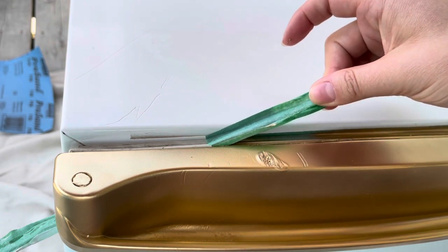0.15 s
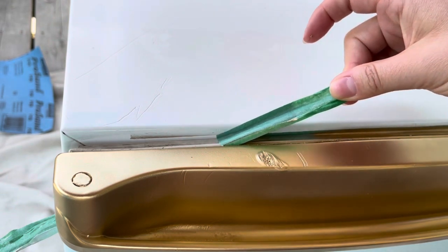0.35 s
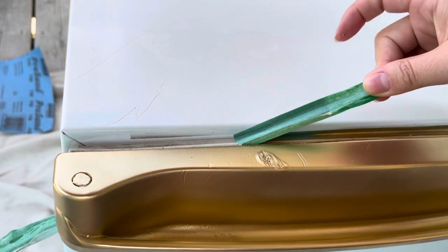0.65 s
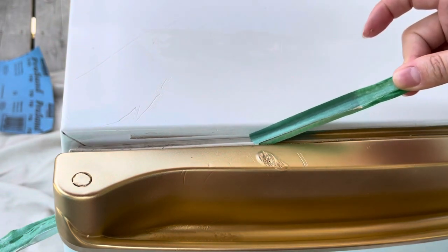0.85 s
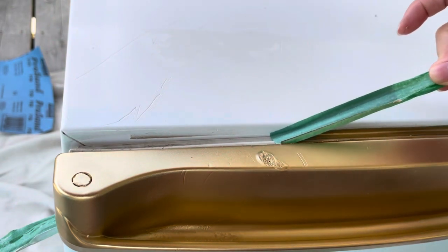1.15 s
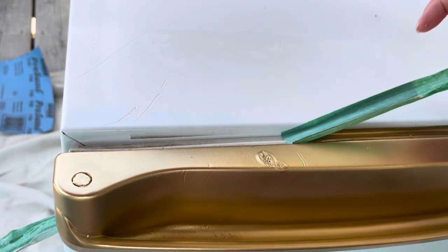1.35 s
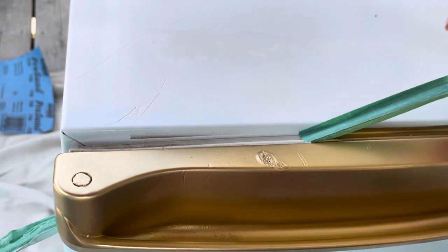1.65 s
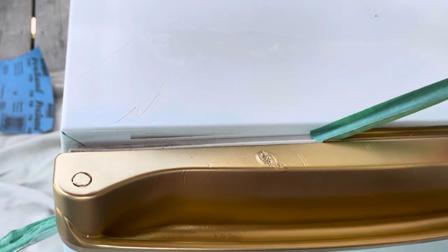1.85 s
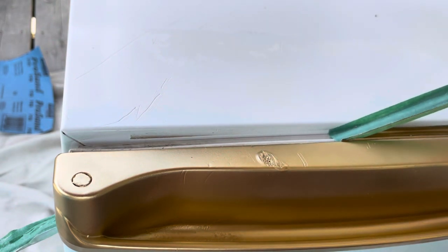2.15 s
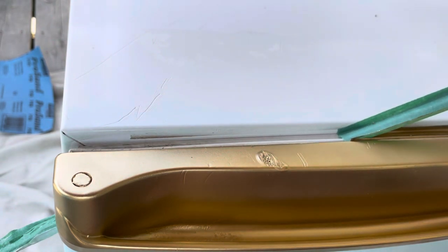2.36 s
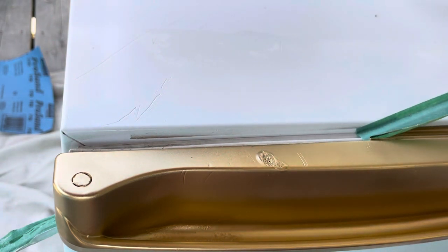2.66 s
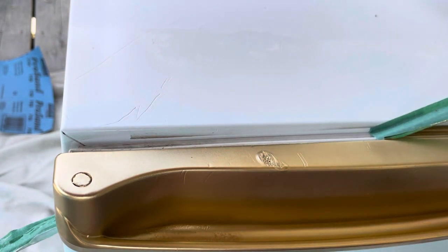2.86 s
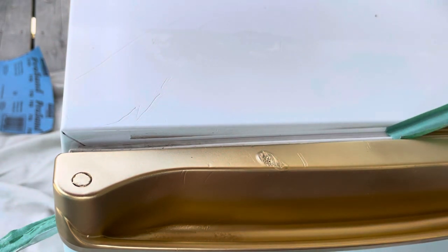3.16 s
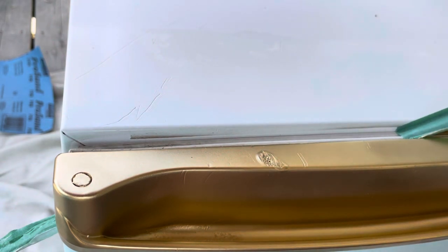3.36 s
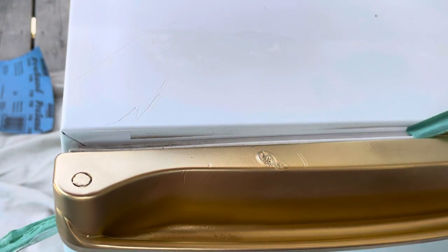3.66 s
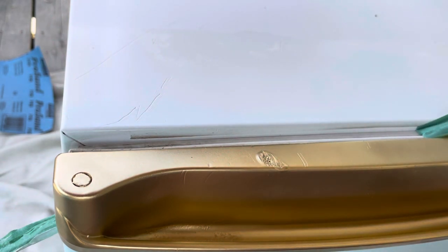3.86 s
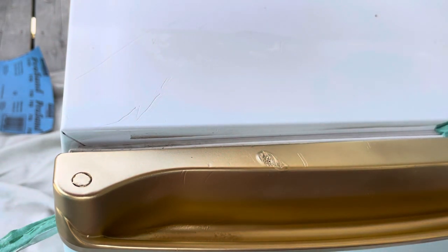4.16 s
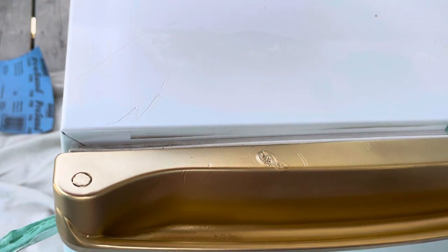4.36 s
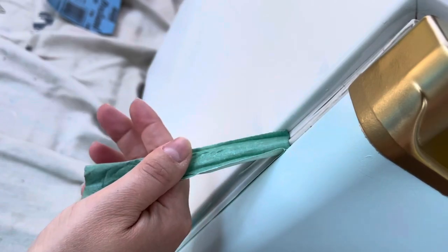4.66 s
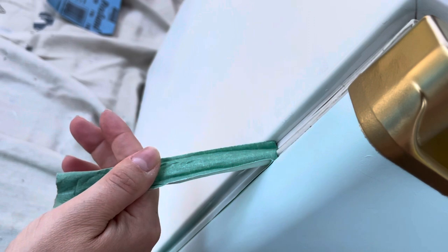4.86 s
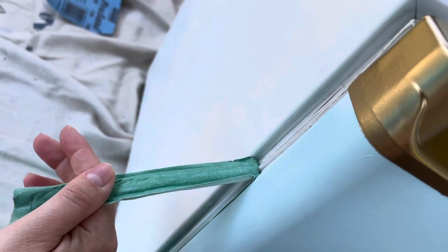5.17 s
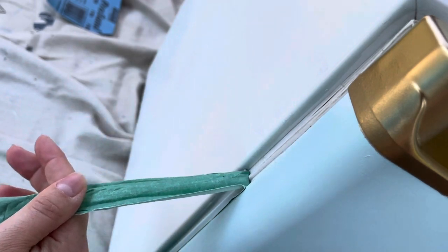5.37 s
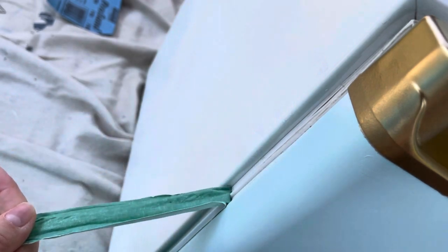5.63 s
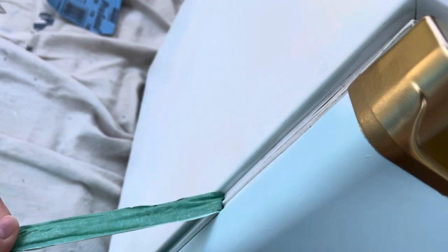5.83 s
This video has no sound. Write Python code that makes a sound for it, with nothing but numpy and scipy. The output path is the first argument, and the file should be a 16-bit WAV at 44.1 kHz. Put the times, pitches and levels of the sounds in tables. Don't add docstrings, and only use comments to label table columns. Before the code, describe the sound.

Masking tape peels slowly off a painted lid, a close continuous papery crackle with sharp ticks, over faint distant traffic and a few sparrow chirps.

```python
import sys
import numpy as np
from scipy import signal
from scipy.fft import rfft, irfft, next_fast_len
from scipy.io import wavfile
from scipy.ndimage import uniform_filter1d, minimum_filter1d

SR = 44100
rng = np.random.default_rng(int(sys.argv[2]) if len(sys.argv) > 2 else 0)


def waveform_to_disk(signal):
    frames = np.transpose(np.atleast_2d(signal))
    scaled = np.clip(frames, -1, 1) * 32767
    samples = np.round(scaled).astype(np.int16)
    wavfile.write(sys.argv[1], SR, samples)


def invert_db(x):
    u = np.asarray(x, float) / 20
    return 10 ** u


N = 264600


def evened(x):
    return x / np.sqrt(np.mean(x ** 2) + 1e-20)


def slow(size):
    smooth = uniform_filter1d(rng.standard_normal(N), size=size)
    return evened(uniform_filter1d(smooth, size=size))


def read(points, hz):
    f, value = np.transpose(points)
    return np.interp(np.log(hz + 1), np.log(f + 1), value)


def curves(rows, t):
    s, *columns = np.transpose(rows)
    return [np.interp(t, s, c) for c in columns]


def add(mix, s, sound):
    part = mix[round(s * SR):][:len(sound)]
    part += sound[:len(part)]


def coloured(x, gain):
    size = next_fast_len(x.shape[-1])
    spectrum = rfft(x, size) * gain(np.fft.rfftfreq(size, 1 / SR))
    return irfft(spectrum, size)[..., :x.shape[-1]]


def ring(modes):
    return lambda hz: sum(invert_db(db) * 1j * hz * w / (f ** 2 - hz ** 2 + 1j * hz * w) for f, w, db in modes)


def tone(x, rows, width_hz):
    hz, db = curves(rows, np.arange(N) / SR)
    turn = np.exp(2j * np.pi * np.cumsum(hz) / SR)
    r = np.exp(-np.pi * width_hz / SR)
    smooth = signal.lfilter([1], np.convolve([1, -r], [1, -r]), x / turn)
    return invert_db(db) * evened((turn * smooth).real)


# f/Hz, left lead/rad
PORT_PHASE = [(300, 1), (2000, 1), (5000, 1), (5700, -1.4), (7000, -1.76), (8500, -3), (10000, -3.5),
              (12000, -5.5), (13500, -6.5), (17000, -5)]
# f/Hz, left over right/dB
PORT_TILT = [(300, 16), (2500, 3.5), (5000, 3.5), (8000, 1), (16000, -0.5)]


def ports(x):
    half = lambda hz: np.exp(.5j * read(PORT_PHASE, hz)) * invert_db(read(PORT_TILT, hz) / 2)
    return np.array([coloured(x, half), coloured(x, lambda hz: 1 / half(hz))])


def echoes(x, t60, start, top_hz):
    t = np.arange(SR // 4) / SR
    taps = rng.choice([-1., 1.], (2, len(t))) * (rng.random((2, len(t))) < .06) * (t > start)
    taps *= invert_db(-60 * t / t60)
    taps = coloured(taps / np.linalg.norm(taps[0]), lambda hz: 1 / (1 + (hz / top_hz) ** 6))
    return signal.fftconvolve(x[None], taps, axes=1)[:, :N]


# t/s, pull as glue fizz/dB, tension ringing the strip/dB, twist favouring its upper ring/dB
PULL = [(0.0, -52.5, -7.5, 5), (0.25, -46, -7.5, 2), (0.7, -45, -6.5, 1), (1.0, -46, -2.5, -11),
        (1.45, -46, -5, -4), (1.9, -46, -3.5, -2), (2.25, -47, -2, -1), (2.65, -47.5, -0.5, 0.5),
        (3.05, -48, 0.8, -10), (3.5, -49.5, -3, 1.5), (3.85, -47.5, -3, -19), (4.15, -44.5, -5.5, -5),
        (4.5, -45.5, -3, -4), (4.87, -43.5, -5, -4), (5.2, -45, -15, 8.5), (5.5, -40.5, -8.5, 6.5),
        (5.75, -48, -7.5, 3), (6.0, -41.5, -7.5, -4)]
# t/s, level/dB, half length/s
JERKS = [(0.2, 2, .06), (1.005, 3, 0.065), (1.458, 2.5, .07), (1.61, 0, 0.045), (1.7, 1, 0.047),
         (2.29, -3, 0.065), (2.424, 5, .07), (2.692, 5.5, 0.056), (3.237, 2.5, .09), (3.693, 3, 0.028),
         (3.99, 2.5, 0.062), (4.123, -6, .02), (4.167, 4, .03), (4.3, -7.5, .07), (4.623, 4, 0.037),
         (4.94, 7, 0.038), (4.99, 3, .04), (5.065, -4.5, 0.049), (5.27, -2.5, 0.041), (5.416, -5, 0.017),
         (5.453, 3, .03)]
# f/Hz, level/dB
FIZZ = [(4000, -32), (6500, -23), (8000, -2), (10000, 1), (12000, -2.5), (14000, 3.5), (15600, -2.5),
        (17000, -13.5)]
# f/Hz, width/Hz, level/dB
LOW_RING = [(2500, 3700, -11), (3800, 690, -3), (4700, 1400, -1)]
# f/Hz, width/Hz, level/dB
HIGH_RING = [(6190, 640, -0.5), (6680, 810, -2.5)]
# t/s, f/Hz, level re fizz/dB
LOW_TONE = [(.6, 4900, -20), (.8, 4750, -24), (1.05, 4700, -14), (1.3, 4500, -16), (1.6, 4370, -23),
            (2.4, 4580, -11), (3, 4600, -22), (3.3, 4600, -40)]
# t/s, f/Hz, level re fizz/dB
HIGH_TONE = [(1.2, 6700, -27), (1.5, 6600, -19), (2, 6800, -14), (2.4, 6400, -17), (2.8, 6600, -10),
             (3.3, 6600, -32)]
SNAPS_PER_S, SNAP_SPREAD_DB = 6000, 3
RING_FOLLOWS_JERK = 0.84


def peel():
    t = np.arange(N) / SR
    fizz_db, tension_db, twist_db = curves(PULL, t)
    jerk_db = sum(db * np.exp(-((t - s) / half) ** 2) for s, db, half in JERKS)
    low_db = tension_db - (1 - RING_FOLLOWS_JERK) * jerk_db
    clumps_db = 1.3 * slow(size=300) + 0.71 * slow(size=2500)

    size = invert_db(SNAP_SPREAD_DB * np.minimum(rng.exponential(1, (2, N)), 5))
    snaps = size * (rng.random((2, N)) < SNAPS_PER_S / SR) * rng.choice([-1., 1.], (2, N))
    tugs = 0.6 * snaps[0] + 0.8 * snaps[1]

    fizz = evened(coloured(snaps[0], lambda hz: invert_db(read(FIZZ, hz))))
    high = evened(coloured(tugs, ring(HIGH_RING)))
    low = evened(coloured(tugs, ring(LOW_RING)))
    rings = invert_db(low_db + twist_db - 6.0) * high + invert_db(low_db - 1.44) * low
    tones = invert_db(3.0 * slow(size=3500)) * tone(tugs, LOW_TONE, width_hz=710)
    tones = tones + tone(tugs, HIGH_TONE, width_hz=460)
    return invert_db(fizz_db + jerk_db + clumps_db) * (tones + invert_db(0.5) * fizz + rings)


# t/s, level/dB
TRAFFIC = [
    (0.0, -40.5),
    (0.8, -37.5),
    (2.4, -39.5),
    (3.7, -37.5),
    (4.6, -37),
    (5.5, -39),
    (6.0, -35),
]
# f/Hz, level/dB per Hz
RUMBLE = [(22, -44), (38, -14.5), (65, 4), (107, -4), (134, -1.5), (151, -10), (168, -1.5), (205, -6.5),
          (247, -5), (281, -11.5), (332, -12.5), (400, -14.5), (520, -61), (880, -120)]
# f/Hz, level/dB per Hz
WASH = [(250, -28), (420, 0), (600, -1.5), (850, -3), (1300, -7), (2000, -10), (3500, -13), (5300, -11.5),
        (6000, -17), (16000, -17)]
# f/Hz, left-right correlation
SAME = [(30, 1), (60, 0.91), (200, 0.94), (380, 0.43), (700, -0.094), (1290, -0.023), (2380, 0.44),
        (4400, -0.096)]
WASH_DB, WASH_FOLLOWS = -49, 0.14
PASS_S, PASS_HALF_S, PASS_DB = 2.75, 0.42, 2.5


def traffic():
    frames, hz = N // 512 + 5, np.fft.rfftfreq(2048, 1 / SR)
    t = np.arange(frames) * 512 / SR
    rumble_db, = curves(TRAFFIC, t)
    wash_db = WASH_DB + WASH_FOLLOWS * (rumble_db - rumble_db.mean())
    wash_db = wash_db + PASS_DB * np.exp(-((t - PASS_S) / PASS_HALF_S) ** 2)

    a, b, c, d, patches = rng.standard_normal((frames, 1025, 5)).T
    patches = uniform_filter1d(uniform_filter1d(patches, size=16, axis=0), size=6, axis=1)
    rumble = evened(invert_db(read(RUMBLE, hz)))[:, None]
    wash = evened(invert_db(read(WASH, hz)))[:, None]
    power = (rumble * invert_db(rumble_db - 1.0)) ** 2 + (wash * invert_db(wash_db + 1.5)) ** 2

    same = np.clip(read(SAME, np.minimum(hz, 3000)), -1, 1)[:, None]
    left, other = a + 1j * b, c + 1j * d
    z = np.array([left, same * left + np.sqrt(1 - same ** 2) * other])
    z *= np.sqrt(power) * invert_db(1.32 * evened(patches))
    return signal.istft(z, nperseg=2048, noverlap=1536)[1][:, :N] * invert_db([[-27.6], [-28.4]])


# start/s, end/s, first f/Hz, last f/Hz, level/dB
ENGINES = [
    (0.18, 2.7, 127, 132.5, -45),
    (3.6, 4.46, 128, 133, -47),
    (2.38, 4.15, 184, 141, -42.5),
    (3.12, 3.7, 413, 389, -48.5),
    (1.025, 1.5, 392, 388, -50),
    (4.68, 6.14, 100, 103, -45),
]
THROB_DB = 1.45
LEAD_RAD, LEAD_RAD_PER_KHZ = 0.17, 1.54


def drone(start, end, first_hz, last_hz, db):
    t = np.arange(N) / SR
    u = np.clip((t - start) / (end - start), 0, 1)
    hz = first_hz + (last_hz - first_hz) * (1 - np.cos(np.pi * u)) / 2
    on = np.clip(np.minimum(t - start, end - t) / 0.14 + .5, 0, 1)
    turn = 2 * np.pi * np.cumsum(hz * (1 + 0.00319 * slow(size=4000))) / SR
    lead = LEAD_RAD + LEAD_RAD_PER_KHZ * first_hz / 1000
    level = np.sqrt(2) * invert_db(db + THROB_DB * slow(size=5000))
    return level * on * np.cos([turn + lead, turn - lead])


# t/s, peak level/dB, dull part re peak/dB
TICKS = [(0.1828, -35, -16), (0.2563, -36, -25), (1.2675, -41, -16), (1.4264, -35, -21), (1.4632, -31, -19),
         (1.4867, -31, -15), (2.225, -36, -4), (2.4087, -34, 0), (2.702, -33, 1), (2.8011, -32, -25),
         (2.9208, -37, -41), (3.4471, -32, -25), (3.4823, -29.5, 9), (3.6998, -33, -25), (3.8166, -36, -22),
         (3.87, -28, -4.5), (4.1505, -19, -15), (4.6213, -29, -8), (4.8597, -27, -8), (4.882, -30, -10),
         (4.921, -13.5, -27), (4.9256, -16, -16), (5.115, -33, -23), (5.3842, -28, -15),
         (5.4277, -9, -12.5), (5.5867, -27, -4.5), (5.6087, -18, -14), (5.6475, -31, -11),
         (5.9225, -19, -25), (4.8687, -28, -25)]
# t/s, length/s, peak level/dB, dull part re peak/dB
TEARS = [
    (3.476, 0.0039, -38, -10),
    (4.934, .021, -27, -25),
    (5.31, 0.0032, -25.5, -13),
    (5.436, 0.008, -32, -9),
    (5.545, .015, -28, -18),
    (5.608, 0.0042, -21.5, -6.5),
    (5.605, .011, -30, -9),
    (5.932, .007, -24, -15),
]
# f/Hz, level/dB
TICK_COLOUR = [(3000, -31.5), (5500, -19), (8000, -8), (12000, -2.5), (13500, -1.5), (16000, -11),
               (17000, -34)]
CRACKLES, CRACKLE_DB, CRACKLE_SPREAD_DB, CRACKLE_DULL_DB = 30, -39.5, 5, -18
DULL_HZ, DULL_SPREAD = 5300, 0.13


def ticks():
    out = np.zeros(N)
    torn = [(s + length * k / 2, db, dull_db) for s, length, db, dull_db in TEARS for k in range(3)]
    small = [(when * N / SR, CRACKLE_DB + CRACKLE_SPREAD_DB * size, CRACKLE_DULL_DB + 16 * (dull - .5))
             for when, size, dull in rng.random((CRACKLES, 3))]
    events = TICKS + torn + small

    t = np.maximum(np.arange(-40, 216) / SR, 0)
    shape = (1 - np.exp(-t / 0.00013)) * np.exp(-(t / 0.0008) ** 2)
    bursts = shape * rng.standard_normal((len(events), 256))
    bright = coloured(bursts, lambda hz: invert_db(read(TICK_COLOUR, hz)))
    rings_hz = DULL_HZ * (1 + DULL_SPREAD * rng.uniform(-1, 1, len(events)))
    for (s, db, dull_db), hz, high, burst in zip(events, rings_hz, bright, bursts):
        low = coloured(burst, ring([(hz, 0.4 * hz, 0), (2200, 1800, -14)]))
        tick = invert_db(-8.5) * evened(high) + invert_db(dull_db - 8.5) * evened(low)
        add(out, max(s - .0014, 0), invert_db(db) * tick)
    return out


# t/s, length/s, start f/Hz, end f/Hz, level/dB
CHIRPS = [(1.165, 0.027, 4800, 4650, -53), (3.208, .03, 4800, 4600, -51), (3.313, 0.041, 4320, 3760, -47.5),
          (3.312, 0.038, 3140, 2550, -53.5), (3.438, 0.071, 5000, 3204, -43.5),
          (3.556, 0.034, 4800, 2900, -48.5), (3.648, 0.039, 4700, 2810, -44),
          (3.763, .035, 4600, 3150, -51.5), (5.762, .044, 4060, 3540, -50.5),
          (5.767, .036, 2900, 2400, -55.5), (5.9, .078, 5120, 3180, -43), (5.92, 0.019, 4880, 4870, -44)]
LONG_S = .06
BEND, LONG_BEND = 1.5, 1.45
FADE_DB_PER_KHZ = 0.5


def sparrows():
    out = np.zeros(N)
    for s, length, start_hz, end_hz, db in CHIRPS:
        u = np.linspace(0, 1, round(length * SR))
        fall = u ** BEND if length < LONG_S else (1 - np.cos(np.pi * u ** LONG_BEND)) / 2
        pitch = start_hz + (end_hz - start_hz) * fall
        swell = abs(np.sin(np.pi * u)) ** 0.33 * invert_db(FADE_DB_PER_KHZ * (pitch - start_hz) / 1000)
        add(out, s, invert_db(db + 3.5) * swell * np.sin(2 * np.pi * np.cumsum(pitch) / SR))
    out *= 1 + 0.45 * slow(size=55)
    return out * invert_db([[1.5], [-1.5]]) + invert_db(3.0) * echoes(out, t60=0.16, start=0.0024, top_hz=8000)


# t/s, peak level/dB, f/Hz, damping per cycle
KNOCKS = [
    (3.481, -24, 3810, 1.9),
    (3.868, -33, 3990, 1.1),
    (3.964, -27.5, 3690, 1.9),
    (4.1964, -21, 2120, 2),
    (4.881, -36, 1250, .8),
    (4.9203, -25.5, 3800, 0.24),
    (5.427, -31, 4470, 2.1),
    (5.5, -35.5, 950, 2.2),
]


def knocks():
    out, t = np.zeros(N), np.arange(300) / SR
    for s, db, hz, damping in KNOCKS:
        add(out, s, invert_db(db + 5.5) * np.sin(2 * np.pi * hz * t) * np.exp(-t * hz * damping))
    return out


# t/s, length/s, f/Hz, level/dB
RUSTLES = [
    (4.027, 0.043, 2500, -45),
    (4.196, 0.033, 1500, -53),
    (4.88, .022, 418, -45.5),
    (4.911, 0.12, 800, -53),
    (5.08, .02, 500, -48),
    (5.433, 0.087, 2840, -48),
    (5.431, 0.098, 900, -55.5),
    (5.6, 0.044, 2200, -52),
]


def rustles():
    out = np.zeros(N)
    for s, length, hz, db in RUSTLES:
        u = np.linspace(0, 1, round(length * SR))
        puff = coloured(rng.standard_normal(len(u)), ring([(hz, 1.1 * hz, 0)]))
        add(out, s, invert_db(db + 3.0) * evened(puff) * np.sin(np.pi * u ** 0.81))
    return out


def scene():
    sharp, broad = ticks() + knocks(), peel() + rustles()
    engines = sum(drone(*row) for row in ENGINES)
    spread = broad + invert_db(-1.5) * sharp
    room = invert_db(-5.5) * echoes(spread, t60=0.037, start=.0015, top_hz=13600)
    return ports(sharp + broad) + room + traffic() + invert_db(-1.5) * engines + sparrows()


SUM_HOLE_LOW_HZ, SUM_HOLE_HIGH_HZ = 7850, 9600
DIFFERENCE_TOP_HZ, TOP_HZ = 12100, 15800
CALM_DB, NO_SNAP_DB = 9, 12.5


def thinned(x):
    hz, t, z = signal.stft(np.array([x[0] + x[1], x[0] - x[1]]) / 2, SR, nperseg=1024)
    treble = uniform_filter1d((np.diff(x, n=2) ** 2).mean(0), size=60)
    jump_db = 10 * np.log10(treble / uniform_filter1d(treble, size=1500) + 1e-9)
    at = np.minimum((t * SR).astype(int), N - 3)
    peak_db = -minimum_filter1d(-jump_db, size=900)[at]
    calm, no_snap = peak_db < CALM_DB, peak_db < NO_SNAP_DB

    step = rng.choice([0, 0, 0, 0, 1, 2], (len(t) // 4 + 1, 3))
    step = np.repeat(step, 4, axis=0)[:len(t)].T
    f = hz[:, None]
    above = f > SUM_HOLE_LOW_HZ + 320 * step[0] - 200
    below = f < SUM_HOLE_HIGH_HZ + 350 * (step[1] > 1)
    z[0] *= 1 - calm * above * below
    z[1] *= 1 - calm * (f > DIFFERENCE_TOP_HZ + 500 * step[2] - 300)
    z *= 1 - no_snap * (f > TOP_HZ)
    mid, side = signal.istft(z, SR, nperseg=1024)[1][:, :N]
    return np.array([mid + side, mid - side])


def roll_off(x):
    return signal.sosfilt(signal.butter(12, 16820, fs=SR, output="sos"), x)


CUT_S, FADE_OUT_S, FADE_IN_S = 4.53, 0.0078, 0.17


def record(dry):
    t = np.arange(N) / SR
    miked = np.clip(coloured(dry, lambda hz: 1 / np.sqrt(1 + (34 / (hz + 1)) ** 6)), -1, 1)
    fade_out = np.clip((CUT_S - t) / FADE_OUT_S, 0, 1)
    fade_in = np.clip((t - CUT_S) / FADE_IN_S, .005, 1) ** 0.9
    mix = thinned(miked) * np.maximum(fade_out, fade_in)
    return roll_off(mix)


dry = scene()
out = record(dry)
waveform_to_disk(out)
```